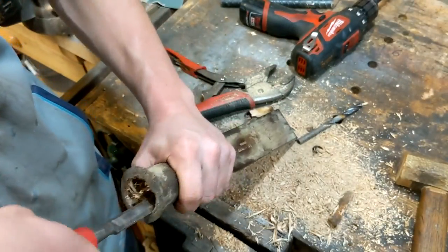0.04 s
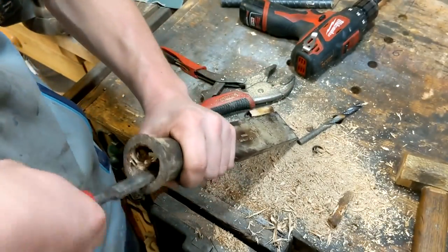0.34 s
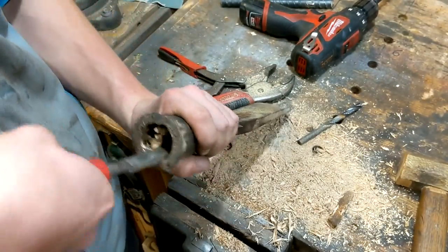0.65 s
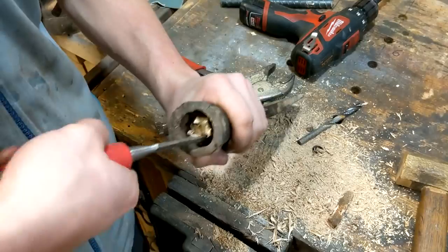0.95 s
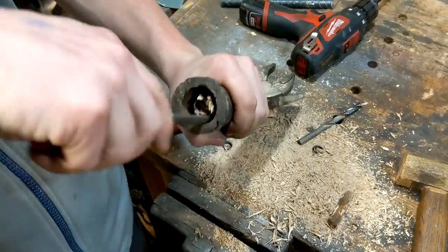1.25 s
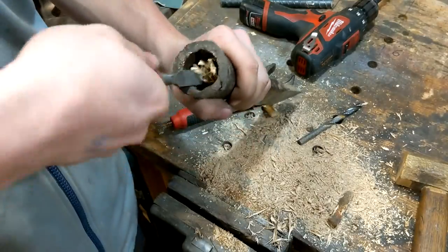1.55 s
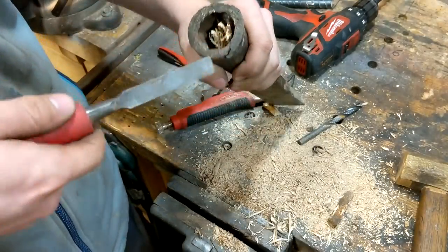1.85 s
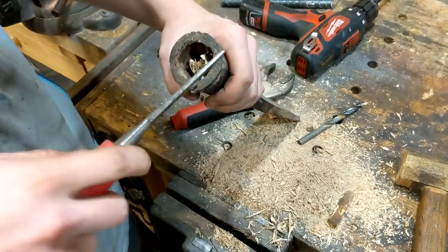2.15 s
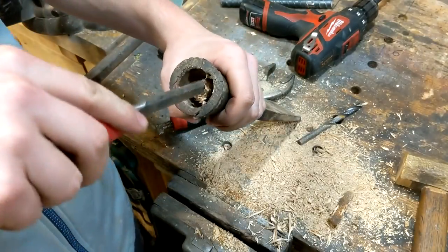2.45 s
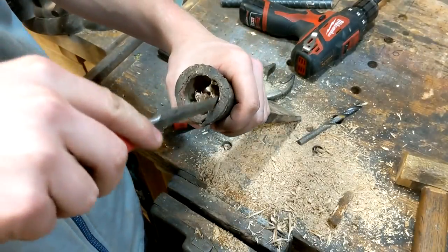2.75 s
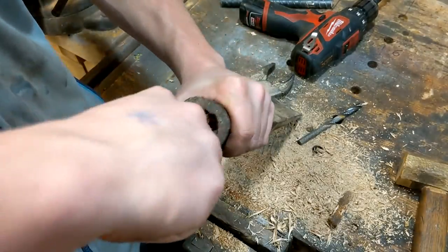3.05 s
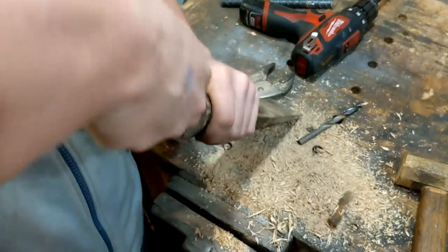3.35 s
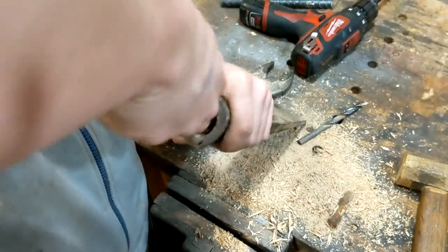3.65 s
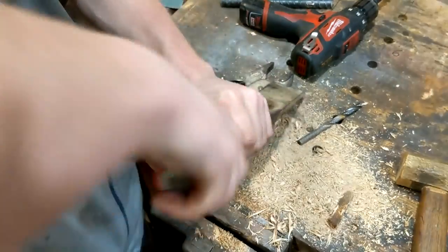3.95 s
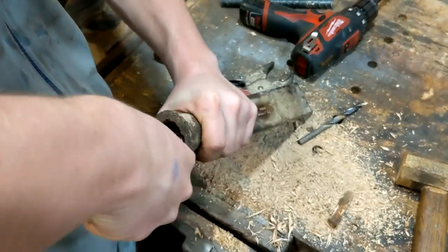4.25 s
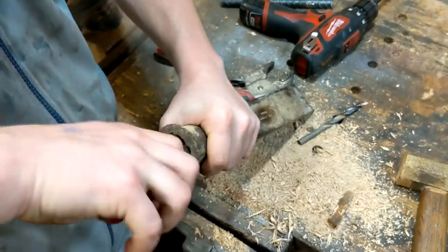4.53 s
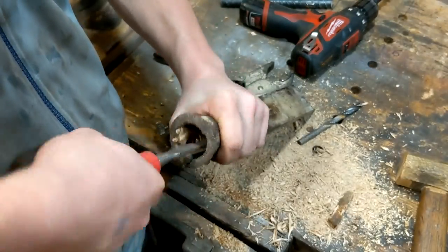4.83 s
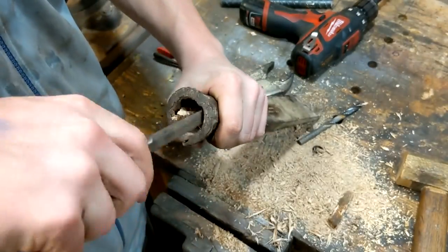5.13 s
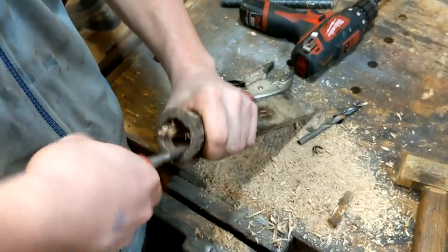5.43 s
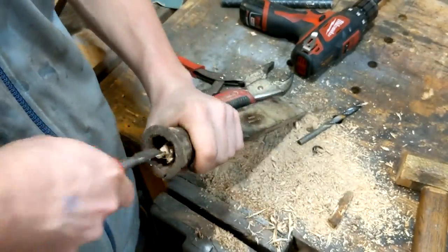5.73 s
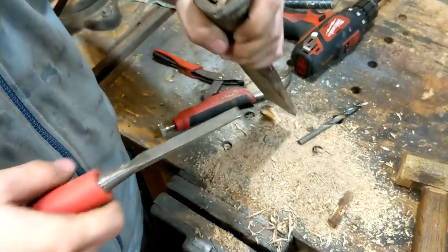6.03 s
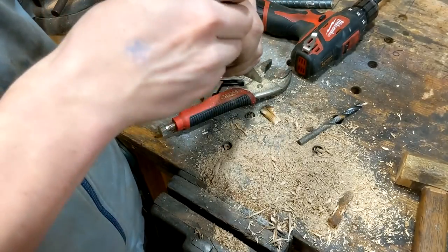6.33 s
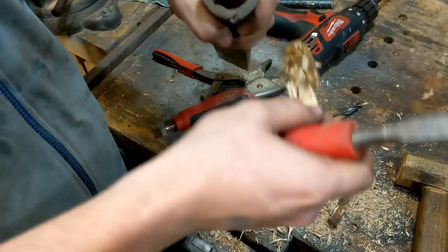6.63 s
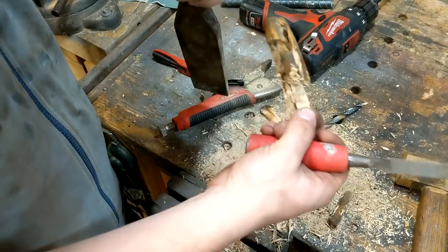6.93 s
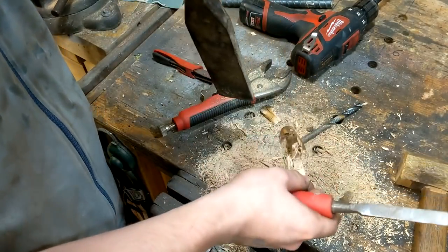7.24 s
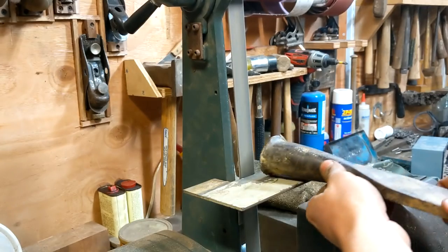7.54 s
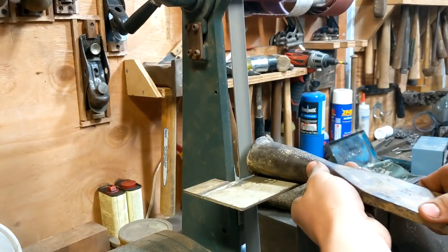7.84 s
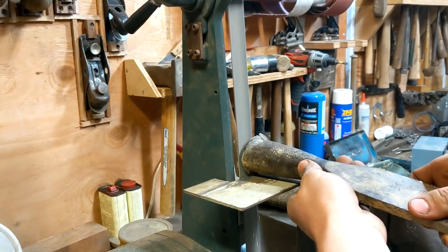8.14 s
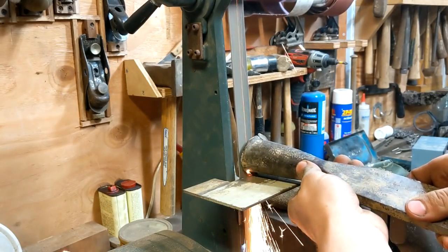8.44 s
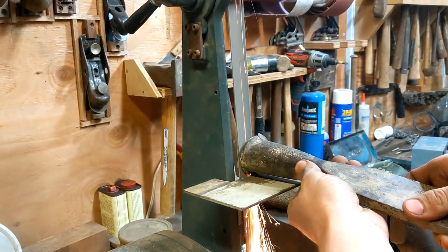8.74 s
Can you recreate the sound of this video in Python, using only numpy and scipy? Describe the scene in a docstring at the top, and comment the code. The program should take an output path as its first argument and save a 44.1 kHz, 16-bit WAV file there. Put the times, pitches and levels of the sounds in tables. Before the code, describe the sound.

In a quiet workshop, a chisel digs dry wood out of a steel tool socket in short, uneven scrapes, with small splintering crackles, brief metallic rings and a few dull thumps on the bench. After about seven seconds the sound cuts abruptly to a running belt grinder. Steel rides lightly on the belt with a hissing rasp, then is pressed in, louder and harsher. Everything sounds close, with little echo.

```python
"""A chisel scrapes and pries dry wood out of the steel socket of a tool held on a workshop bench.
Each stroke is stick-slip friction: tearing fibres excite the resonances of socket, steel and bench.
Then, abruptly, a narrow belt grinder is running: the socket rides lightly on it and is then pressed in.
Grit impacts rasp the steel and ring its modes, and the belt's pattern comes round every lap."""
import sys
import numpy as np
from scipy import signal
from scipy.fft import rfft, irfft
from scipy.io import wavfile
from scipy.ndimage import uniform_filter1d

SR = 44100
rng = np.random.default_rng(int(sys.argv[2]) if len(sys.argv) > 2 else 0)


def int16_out(signal):
    """Quantize to a 16-bit WAV file."""
    q = np.round(np.clip(np.atleast_2d(signal).T, -1, 1) * 32767)
    wavfile.write(sys.argv[1], SR, q.astype(np.int16))


N = 391608
TIME = np.arange(N) / SR
FREQ = np.maximum(np.fft.rfftfreq(N, 1 / SR), 1)

# Chisel strokes. Each row: peak in seconds, level in dB, time the edge takes to bite in seconds,
# steel ring relative to the wood in dB, pitch of the ring in Hz.
CHISEL_STROKES = [(0.236, -49.5, 0.0075, 6, 2200), (0.523, -45, 0.0024, -13, 940),
                  (0.606, -52.5, 0.033, -10, 1640), (0.741, -46.5, 0.0025, -8.5, 1540),
                  (0.965, -48, 0.034, 1.5, 2870), (1.22, -56.5, 0.0044, -1.5, 760),
                  (1.431, -55, 0.043, 1.5, 3170), (1.712, -54.5, 0.04, 2, 2130),
                  (1.801, -57, 0.0036, 12.5, 3030), (2.943, -45.5, 0.014, -3, 2230),
                  (2.975, -49.5, 0.0055, -3.5, 2240), (3.531, -31, .008, -0.5, 3050),
                  (3.819, -49.5, .003, 0.5, 1900), (3.996, -35.5, 0.0034, -3, 1570),
                  (4.029, -43, 0.017, -7.5, 790), (4.171, -49.5, 0.013, -5, 1650),
                  (4.444, -40.5, 0.015, -7.5, 5820), (4.769, -40.5, 0.0079, 3.5, 3860),
                  (4.952, -38, .009, -8, 600), (4.987, -40.5, 0.0051, -11, 310),
                  (5.155, -59, 0.065, 1.5, 1900), (5.201, -55.5, .009, 5.5, 4310),
                  (5.258, -50, .007, 11.5, 5730), (5.555, -52, .03, -5.5, 4030),
                  (5.701, -41, 0.015, 0, 1940), (5.803, -43, 0.014, -7, 2160),
                  (5.835, -38.5, 0.021, -2, 7870), (5.963, -50.5, 0.0069, -1, 1900),
                  (6.48, -48.5, 0.015, -11, 1010)]
# Brief contacts. Each row: peak in seconds, level in dB.
EDGE_SCRATCHES = [(0.041, -61), (.378, -57.5), (.655, -59), (.77, -56.5), (.83, -62.5), (.905, -59),
                  (1.335, -62), (1.556, -60.5), (2.448, -59), (2.86, -55.5), (3.148, -60), (3.325, -59),
                  (3.425, -58), (3.745, -57.5), (3.836, -50), (3.923, -61), (4.918, -53), (5.084, -60),
                  (5.31, -53), (5.35, -57), (5.631, -58.5), (5.905, -53)]  # the edge drags lightly over the wood
WOOD_SPLITS = [(0.455, -61), (0.625, -60.5), (0.925, -60), (0.965, -45), (1.131, -48), (1.705, -59),
               (2.51, -61), (2.975, -58), (3.02, -61), (3.48, -62), (3.535, -41), (4.173, -50.5),
               (4.91, -52), (4.945, -55), (5.42, -65), (5.7, -46), (5.74, -49), (5.8, -54), (6.545, -63.5)]  # dry wood splits with a bright crackle
BENCH_THUMPS = [(0.965, -58), (2.977, -45), (3.536, -49), (3.831, -45), (3.923, -49.5), (4.033, -40.5),
                (4.171, -44), (4.951, -29), (4.986, -26.5), (5.716, -38.5)]  # the work thumps down on the bench
# Spectral envelopes. Each row: frequency in Hz, relative spectral density in dB.
SOCKET_SPECTRUM = [(150, -38), (320, -6), (550, -15.5), (850, 0), (1600, -2), (2300, -9), (3200, -13),
                   (6000, -34.5)]  # the wood-filled socket
STEEL_SPECTRUM = [(1500, -17), (2400, -1.5), (3200, -1.5), (4500, -5.5), (6200, -14), (8000, -16.5),
                  (14000, -26)]  # the steel of chisel and socket
SPLINTER_SPECTRUM = [(3000, -9), (6500, 0.5), (7800, 2.5), (10000, 0), (13000, -5), (16000, -25)]
BENCH_SPECTRUM = [(35, -12), (60, 4), (95, 7), (150, -3), (210, -5.5), (295, 7), (400, -4.5), (570, -3.5),
                  (750, -9), (1500, -51)]
LIGHT_RASP_SPECTRUM = [(40, -7), (65, -32), (110, -10), (330, -14), (520, -8.5), (720, -6.5), (950, -0.5),
                       (1500, 2.5), (2200, -3), (4000, -1.5), (7000, -2.5), (10000, -6.5), (13000, -9),
                       (15500, -13.5)]
PRESSED_RASP_SPECTRUM = [(40, -12), (65, -35), (110, -9.5), (330, -19), (520, -8), (720, -8.5), (950, 3.5),
                         (1500, 2.5), (2200, -0.5), (4000, -0.5), (7000, -2), (10000, -1), (13000, -3),
                         (15500, -9.5)]
AIR_SPECTRUM = [(13, -37.5), (22, 1), (70, -4), (124, -13.5), (154, -10.5), (382, -25), (414, -22),
                (869, -14), (1500, -20.5), (1870, -27.5), (15500, -40)]
# Resonances under the chisel. Each row: frequency in Hz, bandwidth in Hz, lift in dB.
SOCKET_RESONANCES = [(750, 38, 6.4), (990, 55, 2.8), (1607, 240, 3.4), (1900, 200, 6), (2230, 69, 11.4)]
STEEL_RESONANCES = [(2240, 110, 3.2), (3580, 37, 1.8), (4310, 120, 9.3), (5730, 720, 12.2), (5830, 39, 10),
                    (7870, 88, 15)]

# Load of the steel on the belt. Each row: time in seconds, pressure from 0 to 1.
BELT_PRESSURE = [(7.4, 0), (8.238, 0.05), (8.256, 0.99), (8.48, .85), (8.65, 0.99), (8.88, 1)]
# Loudness of grinding. Each row: time in seconds, platen roar in dB, grit hiss in dB.
GRINDING_LEVELS = [(7.42, -38, -32), (7.444, -36.5, -32.5), (8.226, -38, -32.5), (8.276, -29, -25.5),
                   (8.428, -32.5, -28.5), (8.87, -30, -25.5)]
# Resonances of steel and platen. Each row: frequency in Hz, bandwidth in Hz, lift in dB under light
# contact, lift in dB when pressed.
GRINDING_RESONANCES = [(993, 59, 2.5, 5), (1455, 150, 7.5, 13), (1770, 185, 0.5, 12), (2960, 130, 7.5, 2.5),
                       (3410, 200, 5, 2.5), (3940, 53, 6.5, -3), (5800, 570, 6.5, 5.5),
                       (7460, 260, 5.5, 7.5), (9470, 700, 5, 4), (11540, 600, 8, 3.5),
                       (15100, 240, 4, 12.5)]
# Tones of the pressed steel. Each row: multiple of the lap rate, level relative to the roar in dB.
SINGING_HARMONICS = [(64, -20), (68, -23), (72, -24), (74, -24), (79, -21)]
# The steel chatters on the belt. Each row: peak in seconds, pitch in Hz, 1/e time in seconds, level in dB.
CHATTER_BURSTS = [(7.662, 1085, 0.013, -32.5), (7.974, 1430, 0.005, -32)]

# How hard the hands bear on the work. Each row: time in seconds, effort in dB.
HAND_EFFORT = [(0, -1.5), (.2, -10.5), (.4, 1), (.95, -6), (1.2, -9), (1.65, -3), (1.95, -14.5), (2.7, -11),
               (2.9, -1), (3.2, -5.5), (3.9, 2.5), (4.35, -17), (4.8, -3.5), (5.15, -5.5), (5.85, 0.5),
               (6.1, -16), (7.3, -17.5)]
# Background noise of the shop. Each row: time in seconds, level in dB.
AIR_LEVELS = [(0.0, -66), (2.43, -70), (7.35, -65.5)]
# Hums. Each row: frequency in Hz, level in dB.
MOTOR_TONES = [(62, -63.5), (156.1, -59.5), (468.3, -58.5)]
SHOP_TONES = [(64.6, -66.5), (151, -70)]
# Stereo width. Each row: frequency in Hz, side relative to mid in dB.
BENCH_STEREO = [(80, -21.5), (250, -14.5), (600, -3), (1300, -6.5), (2500, -1), (6000, -0.5), (14000, 0)]
GRINDER_STEREO = [(60, -19), (150, -8.5), (400, -1), (1000, -8), (1700, -6), (2400, -0.5), (4500, 0.5),
                  (14000, 0.5)]

SHOP_HUM_FROM_S, GRINDER_FROM_S = 6.0, 7.404
LAP_HZ, LAP_SAG_HZ = 22.57, .29  # the belt's free lap rate, and its drop at full pressure


def chisel():
    """Source and filter: tearing fibres drive the socket, steel, splinters and bench."""
    socket = unit(slope(SOCKET_SPECTRUM) * resonances(SOCKET_RESONANCES))
    steel = unit(slope(STEEL_SPECTRUM) * resonances(STEEL_RESONANCES))
    splinters, bench = unit(slope(SPLINTER_SPECTRUM)), unit(slope(BENCH_SPECTRUM))
    out = np.zeros((2, N))
    for peak_s, db, bite_s, steel_db, ring_hz in CHISEL_STROKES:
        t = TIME[around(peak_s)] - peak_s
        force = contact_force(t, rise=bite_s, fall=0.013 + 0.2 * bite_s, curve=1.08)
        x = friction(force, socket, rate=5000, spread_db=4, db=-1.5)
        x += friction(force, steel, rate=5500, spread_db=1.5, db=steel_db - 2)
        x += friction(force, splinters, rate=4300, spread_db=1, db=-15.5 + 0.47 * steel_db)
        # Where the edge bites decides which resonance speaks most.
        ring_q = ring_hz / (70 + 0.022 * ring_hz)
        x += 2.26 * signal.lfilter(*signal.iirpeak(ring_hz, ring_q, fs=SR), x)
        x += friction(force ** 2, bench, rate=2400, spread_db=0.5, db=-11.5)
        # The first fibres snap ahead of the peak; slow bites hardly snap.
        snap = contact_force(t + 0.81 * bite_s, rise=.0003, fall=0.0011, curve=0.62)
        snap *= np.exp(-(bite_s / 0.016) ** 2)
        x += friction(snap, socket + undb(steel_db) * steel, rate=12000, spread_db=2, db=4.5)
        out[:, around(peak_s)] += undb(db) * at_bench(x)
    scratch_body = unit(unit(socket + steel) + 0.12 * splinters)
    split_body = unit(splinters + 0.24 * steel)
    thump_body = unit(bench + 0.15 * socket)
    out += contacts(EDGE_SCRATCHES, scratch_body, rise=0.024, fall=0.024, rate=2200, spread_db=5)
    out += contacts(WOOD_SPLITS, split_body, rise=0.007, fall=0.014, rate=4500, spread_db=5)
    return out + contacts(BENCH_THUMPS, thump_body, rise=0.0028, fall=0.011, rate=8000, spread_db=0)


def contacts(table, body, rise, fall, rate, spread_db):
    """Transient excitation: brief contacts share one force pulse and sound through one body."""
    out = np.zeros((2, N))
    for peak_s, db in table:
        force = contact_force(TIME[around(peak_s)] - peak_s, rise, fall, curve=1.1)
        out[:, around(peak_s)] += at_bench(friction(force, body, rate, spread_db, db))
    return out


def contact_force(t, rise, fall, curve):
    """Loading and release: force peaks at t = 0; rise and fall are in seconds, held to at least 1 ms."""
    loading = (np.maximum(-t, 0) / max(rise, 1e-3)) ** (1.2 * curve)
    release = (np.maximum(t, 0) / max(fall, 1e-3)) ** curve
    return np.exp(-loading - release)


def friction(force, body, rate, spread_db, db):
    """Forced response: the force scales the slips and the body's frequency response filters them."""
    return undb(db) * shape(force * slips(rate, spread_db, size=len(force)), body)


def slips(rate, spread_db, size=N):
    """Stick-slip friction: random impulses of uneven size, on average `rate` a second."""
    hit = rng.random(size) < rate / SR
    impulses = hit * rng.standard_normal(size)
    return unit(impulses * undb(spread_db * np.minimum(rng.exponential(size=size), 4)))


def grinder():
    """Abrasion under load: the belt rasps the steel, which sings and chatters over the motor's hum."""
    pressure, = curves(BELT_PRESSURE)
    roar_db, hiss_db = curves(GRINDING_LEVELS)
    laps = np.cumsum(LAP_HZ - LAP_SAG_HZ * pressure) / SR  # the motor slows under load
    dry_rasp = rasp(belt_grit(laps), pressure, roar_db, hiss_db)
    heard = room(dry_rasp, GRINDER_STEREO, t60=0.29, late_db=-6, early_t60=0.065, early_db=-24)
    tones = singing(laps, pressure, roar_db) + chatter()
    return heard + np.sqrt(2) * tones * undb([[1.5], [-1.5]]) + hum(MOTOR_TONES, waver_db=2.7)


def belt_grit(laps):
    """Periodic and random excitation: part of the grit's pattern returns every lap, the rest is new."""
    size = int(SR / LAP_HZ)
    pattern = unit(irfft(np.exp(2j * np.pi * rng.random(size // 2 + 1)), size))
    share = slope([(300, -7.5), (1500, -5), (3000, -8), (7000, -5.5), (15000, -2)])
    repeating = shape(pattern[(laps % 1 * size).astype(int)], share)
    fresh = shape(slips(rate=18000, spread_db=0.7), np.sqrt(1 - share ** 2))
    uneven_run_db = .5 * np.sin(2 * np.pi * laps) + 0.3 * drift(70)
    return (repeating + fresh) * undb(uneven_run_db)


def rasp(grit, pressure, roar_db, hiss_db):
    """Modal filtering: grit rings steel and platen; pressure blends a light and a pressed response."""
    light_modes = [(hz, width, db) for hz, width, db, _ in GRINDING_RESONANCES]
    pressed_modes = [(hz, width, db) for hz, width, _, db in GRINDING_RESONANCES]
    light = slope(LIGHT_RASP_SPECTRUM) * resonances(light_modes)
    pressed = slope(PRESSED_RASP_SPECTRUM) * resonances(pressed_modes)
    low = 1 / (1 + (FREQ / 2200) ** 12)  # crossover from roar to hiss
    out = 0
    for band, db in ((low, roar_db - 0.5), (1 - low, hiss_db + 0.15)):
        for body, weight in ((light, 1 - pressure), (pressed, pressure)):
            out += undb(db) * weight * shape(grit, unit(body * band))
    return out


def singing(laps, pressure, roar_db):
    """Forced vibration: the pressed steel sings at harmonics of the lap rate."""
    phase = 2 * np.pi * laps + 0.011 * drift(7.8)  # the belt creeps on its wheels
    tones = sum(undb(db) * np.sin(k * phase + 2 * np.pi * rng.random()) for k, db in SINGING_HARMONICS)
    return tones * pressure * undb(roar_db + 1.4 * drift(7.3))


def chatter():
    """Contact vibration: the steel chatters on the belt in Gaussian tone bursts."""
    return sum(undb(db) * np.exp(-((TIME - peak_s) / fade_s) ** 2) * np.sin(2 * np.pi * hz * TIME)
               for peak_s, hz, fade_s, db in CHATTER_BURSTS)


def bench_rumble():
    """Structure-borne sound: the heavy bench rumbles unevenly as the hands bear on the work."""
    effort_db, = curves(HAND_EFFORT)
    body = slope([(25, -24), (50, -10), (70, -5), (100, 1), (150, -25), (260, -21.5), (800, -37),
                  (3000, -62)])
    rumble = unit(shape(rng.standard_normal(N), body))
    return rumble * undb(-60.5 + effort_db + 2.1 * drift(12))


def shop_air():
    """Ambient noise: a soft rush, wide in the treble, over a low rumble; a faint hum joins late."""
    air_db, = curves(AIR_LEVELS)
    colour = slope(AIR_SPECTRUM)
    colour /= np.sqrt(np.mean(colour ** 2 * ((FREQ > 600) & (FREQ < 1400))))  # midrange sets the level
    width = slope([(80, -23.5), (250, -4), (1000, -3.5), (3000, -2), (12000, 0)])
    mid = shape(rng.standard_normal(N), colour)
    side = shape(rng.standard_normal(N), colour * width)
    rush = np.array([mid + side, mid - side]) * undb(air_db + .5 * drift(6.7) - 1.68)
    return rush + hum(SHOP_TONES, waver_db=1) * np.clip((TIME - SHOP_HUM_FROM_S) / 0.36, 0, 1)


def hum(tones, waver_db):
    """A line spectrum with slight random modulation of amplitude and phase."""
    return sum(np.sqrt(2) * undb(db + waver_db * drift(7.8))
               * np.sin(2 * np.pi * hz * TIME + 0.61 * drift(6.8)) for hz, db in tones)


def at_bench(x):
    """Early reflections: every point of contact on the bench has a set of its own."""
    return room(x, BENCH_STEREO, t60=0.18, late_db=-6.5, early_t60=0.028, early_db=-0.5)


def room(x, width, t60, late_db, early_t60, early_db, left_db=2.0):
    """Reverberation by convolution: direct sound, quick reflections off bench and walls, a short tail."""
    t = TIME[:len(x)]
    early, late = (unit(np.exp(-np.log(1000) * t / fade) * (t < fade)) for fade in (early_t60, t60))
    echoes = np.hypot(undb(early_db) * early, undb(late_db) * late) * rng.standard_normal((2, len(x)))
    direct = unit(1. * (t == 0))
    mid, side = (irfft(rfft(x) * rfft(unit(response)), len(x)) / np.sqrt(len(x))
                 for response in (direct + echoes[0], echoes[1]))
    side = shape(side, slope(width))
    return np.array([(mid + side) * undb(left_db / 2), (mid - side) * undb(-left_db / 2)])


def resonances(modes):
    """Gain at every frequency of modes whose powers add above a floor of 1."""
    return np.sqrt(1 + sum((undb(abs(db)) ** 2 - 1) / (1 + (2 * (FREQ - hz) / width) ** 2) ** 2
                           for hz, width, db in modes))


def slope(points):
    """Gain at every frequency, interpolated between (Hz, dB) points."""
    hz, db = np.transpose(points)
    return undb(np.interp(np.log(FREQ), np.log(hz), db))


def shape(x, gain):
    """Zero-phase filtering: the spectrum is multiplied by a gain at every frequency."""
    return irfft(rfft(x) * np.interp(np.fft.rfftfreq(len(x), 1 / SR), FREQ, gain), len(x))


def drift(rate):
    """Random modulation of rms 1: `rate` steps a second, smoothed twice."""
    hold = int(SR / rate)
    steps = np.repeat(rng.standard_normal(N // hold + 1), hold)
    return unit(uniform_filter1d(uniform_filter1d(steps, hold), hold)[:N])


def curves(table):
    """Linear interpolation in time of each column after the first."""
    seconds, *columns = np.transpose(table)
    return [np.interp(TIME, seconds, column) for column in columns]


def around(peak_s):
    """The samples in which a contact and its echoes sound."""
    start = max(int((peak_s - .1) * SR), 0)
    return slice(start, start + 12288)


def undb(db):
    """Decibels to amplitude ratio."""
    return 10 ** (np.asarray(db) / 20)


def unit(x):
    """Normalisation to rms 1."""
    return x / np.sqrt(np.mean(x ** 2))


def scene():
    """Superposition: the sounds of bench work add, then give way at once to the running grinder."""
    grinding = np.clip((TIME - GRINDER_FROM_S) / .002, 0, 1)
    return (1 - grinding) * (chisel() + bench_rumble() + shop_air()) + grinding * grinder()


def record(dry):
    """Band limiting: a steep elliptic low-pass removes the treble above 15.7 kHz."""
    return signal.sosfilt(signal.ellip(12, .1, 80, 15700, fs=SR, output="sos"), dry)


dry = scene()
out = record(dry)
int16_out(out)
```